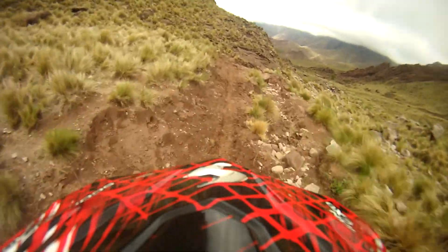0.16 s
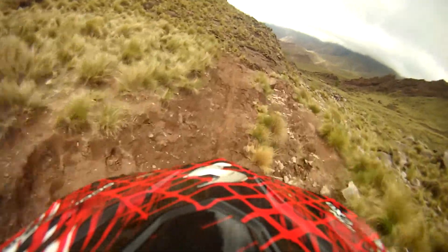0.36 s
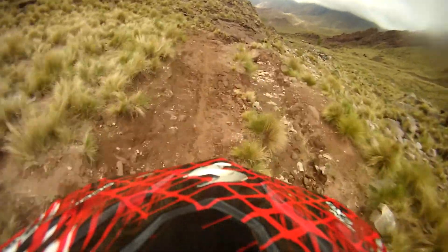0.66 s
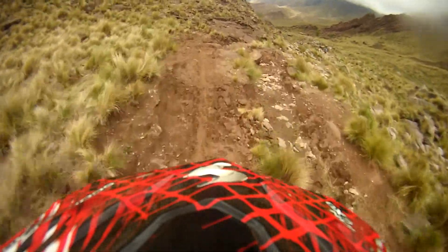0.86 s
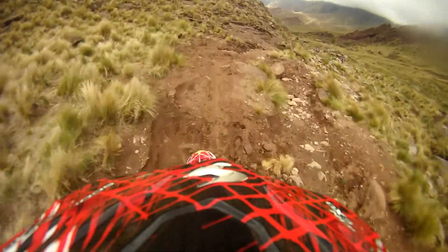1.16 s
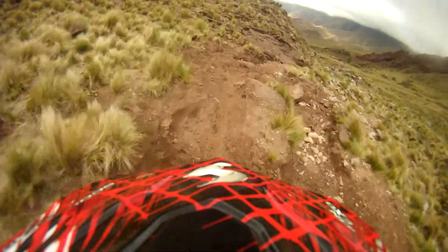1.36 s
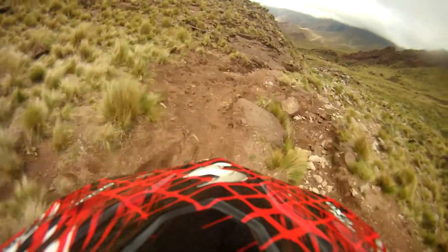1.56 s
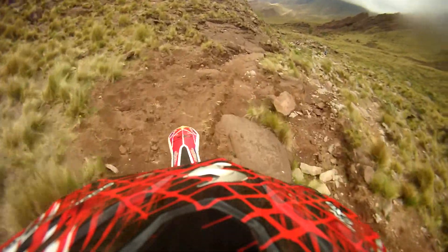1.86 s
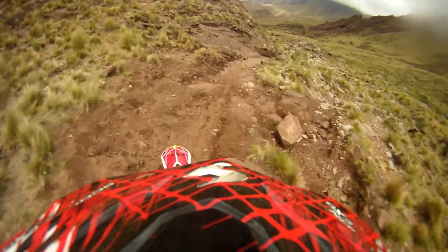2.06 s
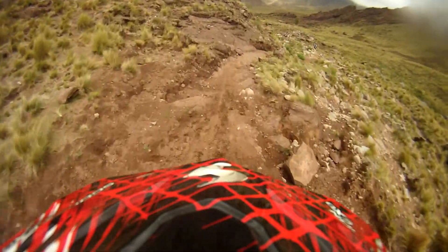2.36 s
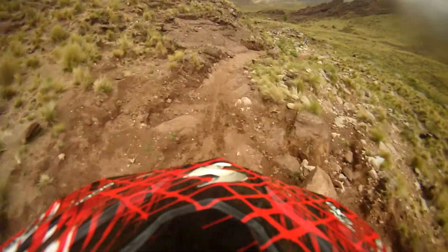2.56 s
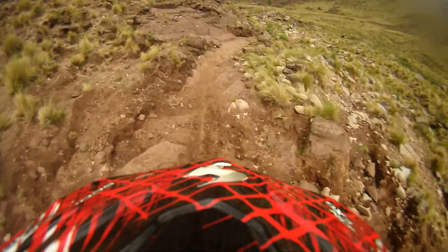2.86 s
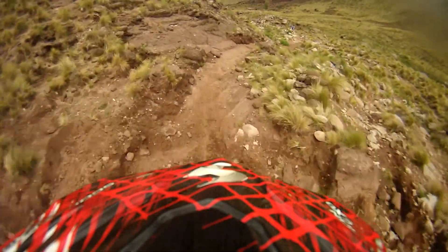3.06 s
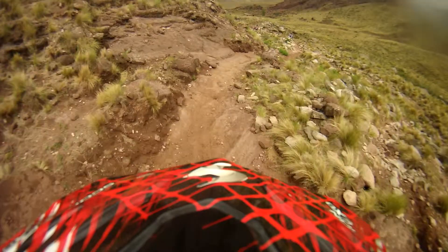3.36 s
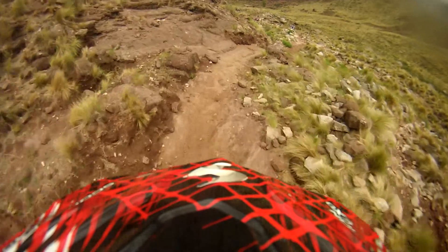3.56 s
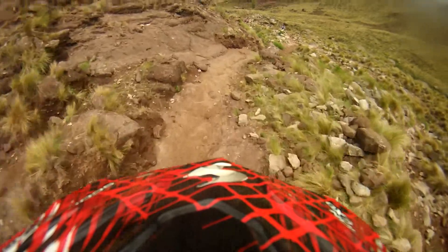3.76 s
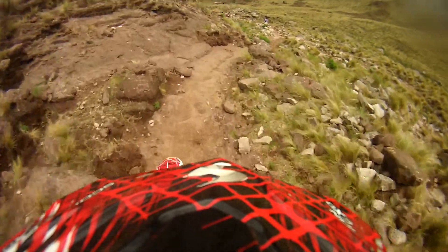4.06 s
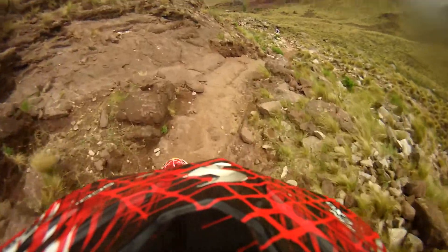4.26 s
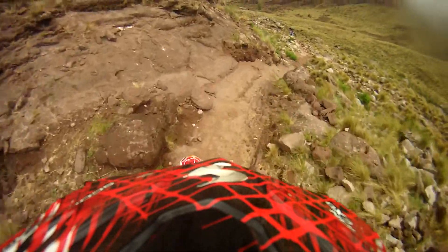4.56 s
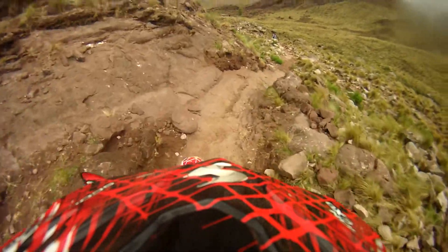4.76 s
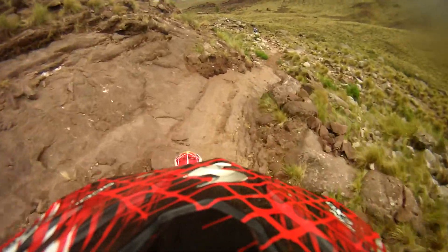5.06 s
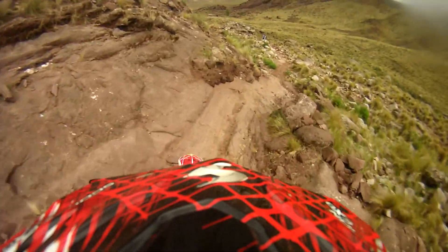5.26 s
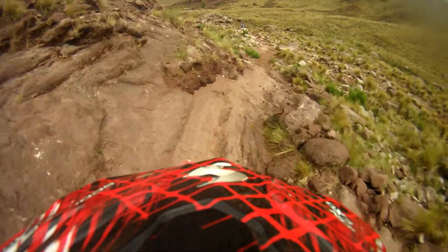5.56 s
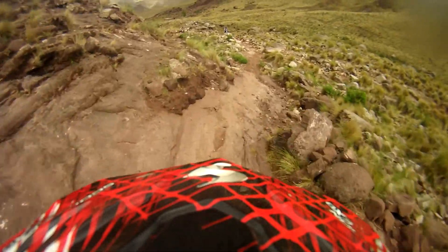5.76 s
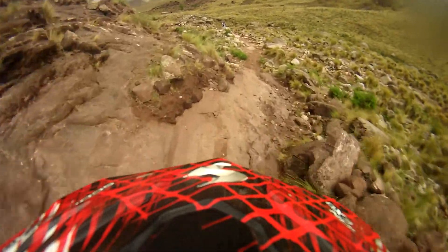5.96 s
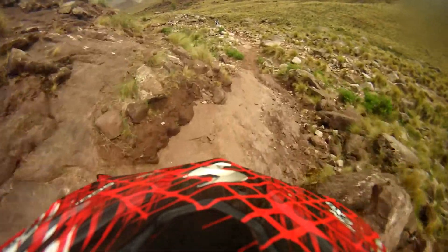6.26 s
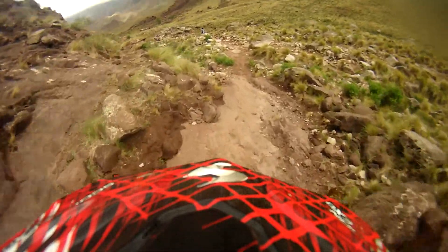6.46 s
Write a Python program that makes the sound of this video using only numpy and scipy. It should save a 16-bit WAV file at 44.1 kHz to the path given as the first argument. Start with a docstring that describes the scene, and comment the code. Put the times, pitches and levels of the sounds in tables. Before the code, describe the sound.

From a cased camera on the rider's helmet, a four-stroke single dirt bike pulls over a rocky mountain trail. Tyres rumble and crunch, a stone knocks the bike, then a wide throttle twist roars at about one second. Another stone hits, revs sink, and the chain slaps. The engine chugs near idle, with ticking clatter and faint gear whine, the intake briefly faltering near the end.

```python
"""A four-stroke single dirt bike on a rocky trail, heard from a camera in a case on the rider's helmet.
It starts well above idle, tyres rumbling and crunching over rocks; one wide twist roars at 1.1 s.
Stones knock the bike at 0.6 and 2.5 s; the revs sink to a chug near idle, the chain slaps at 3.4 s, the intake falters at 6.1 s.
Throughout, suction kicks ring the airbox, firings thump in the silencer, noise and ticks clatter in the casings,
narrow noise bands sing as gears and chain, and shaped noise makes roar, ground and wind."""
import sys
import numpy as np
from scipy import signal
from scipy.fft import rfft, irfft
from scipy.io import wavfile

SR = 44100
rng = np.random.default_rng(int(sys.argv[2]) if len(sys.argv) > 2 else 0)


def materialize(psi):
    """Save the field psi as 16-bit PCM at rate SR to the path in sys.argv[1].

    A 1-D psi becomes a single channel; in a 2-D psi each row is a channel.
    """
    bounded = np.clip(np.atleast_2d(psi).T, -1, 1)
    quanta = np.round(bounded * 32767).astype(np.int16)
    wavfile.write(sys.argv[1], SR, quanta)


N = 292383
T = np.arange(N) / SR

# engine speed: (time [s], firing rate [Hz])
FIRING_RATE = [(0.0, 20.81), (0.23, 24.1), (0.77, 22.63), (0.99, 26.53), (1.36, 22.94), (1.84, 24.14),
               (1.9, 19.29), (2.36, 15.49), (2.84, 20.36), (3.39, 16.71), (3.68, 18.0), (4.16, 14.99),
               (4.66, 15.13), (4.82, 13.86), (5.07, 15.95), (5.33, 14.4), (6.17, 15.73), (6.63, 17.97)]
# throttle twists: (time at the widest [s], opening [0-1], opening time [s], closing time [s])
THROTTLE_TWISTS = [(.03, 0.39, 0.3, 0.078), (1.092, 0.76, .26, .23), (1.82, 0.17, 0.18, 0.17),
                   (5.0, 0.19, 0.47, 0.34), (6.35, 0.2, 0.62, 0.21), (6.6, 0.2, 0.19, .15)]

# resonances: (frequency [Hz], width [Hz], relative level [dB])
SNORKEL_MODES = [(208, 85, 0)]
AIRBOX_MODES = [(268, 92, 0)]
SILENCER_MODES = [(35, 17, 0), (66, 40, -7), (98, 24, -13), (125, 20, -18)]
FRAME_MODES = [(42, 48, 0)]
CASING_MODES = [(502, 110, 4.5), (1210, 59, -1), (1353, 22, 10.5), (1609, 33, 7), (2234, 240, 4.5),
                (2640, 650, -16.5)]
STONE_MODES = [(1150, 130, 0), (1600, 500, -8), (2350, 450, -10), (5000, 900, -24)]
SWINGARM_MODES = [(2280, 140, -5.5), (2540, 58, -3), (4710, 99, -7)]
# camera case passing a little sharp treble of the knocks, same columns
CASE_LEAK_MODES = [(5200, 1900, -9)]

# noise spectra: (frequency [Hz], relative density [dB per Hz])
WIND_SPECTRUM = [(8, -6), (20, 0.5), (38, -4.5), (60, -10.5), (120, -35.5), (400, -68), (2000, -93)]
RUMBLE_SPECTRUM = [(15, -7), (45, 14), (85, 13.5), (140, 13.5), (200, 9), (320, -9), (600, -51.5),
                   (3000, -96)]
CRUNCH_SPECTRUM = [(150, -27), (300, 1), (500, -7), (900, -17), (2000, -48.5), (6000, -79)]
CLATTER_SPECTRUM = [(200, -28.5), (350, -16.5), (480, -4), (650, 1.5), (950, 0), (1250, -4), (1500, -8.5),
                    (1950, -2), (2350, -1), (3000, -9.5), (3600, -23.5), (4200, -34), (4900, -31),
                    (7000, -42), (10000, -76)]
ROAR_SPECTRUM = [(110, -39), (165, -13), (215, -2), (280, 8.5), (390, 1.5), (520, -5), (700, -10.5),
                 (1100, -11.5), (1600, -27), (3000, -59.5), (7000, -107)]

# layer levels: (at idle [dB], per doubling of engine speed [dB], added at full throttle [dB])
WIND_EFFORT = (-44, 3.4, 2)
DIRT_EFFORT = (-54, 15, 1.5)
GEAR_EFFORT = (-60, 3.6, 5)
CLATTER_EFFORT = (-53.5, 6.05, 9.6)
ROAR_EFFORT = (-57, 11.5, 22.4)
AIRBOX_EFFORT = (-45, 0.28, 21.8)
# same columns, relative to the exhaust and frame levels
THUMP_EFFORT = (0.37, -2.2, 1)

# rocky patches under the tyres: (time at the middle [s], half length [s], level [dB])
ROCKY_PATCHES = [(0.055, 0.11, -31), (0.237, 0.026, -36), (0.945, 0.17, -30), (1.15, 0.18, -35),
                 (1.89, 0.1, -32), (2.076, 0.15, -34), (3.075, 0.18, -37.5), (3.358, 0.13, -41.5),
                 (5.864, 0.12, -48)]
# gears singing up under load: (time at the middle [s], half length [s], level [dB])
GEAR_SWELLS = [(.07, 0.078, -46.5), (.62, 0.16, -50), (1.64, 0.086, -45), (1.8, .1, -47.5),
               (2.16, 0.089, -54), (2.88, 0.037, -55), (3.68, 0.034, -51), (4.75, .22, -59),
               (5.42, 0.13, -53.5)]
# stones striking the bike: (time [s], peak level [dB])
STONE_HITS = [(.6265, -35), (.6291, -28.5), (2.4585, -28), (2.4611, -34)]
# chain slapping the swingarm: (time [s], peak level [dB])
CHAIN_SLAPS = [(3.397, -38.5), (3.409, -43), (3.526, -38), (3.533, -37)]
# chain whirring over its guide: (time [s], centre [Hz], level [dB])
CHAIN_WHIR = [(0, 1292, -68), (2.5, 1340, -81), (2.85, 1316, -57.5), (3.15, 1256, -68.5), (3.65, 1102, -60),
              (4.8, 970, -65), (5.6, 949, -68), (6.2, 981, -56.5), (6.63, 1005, -70)]

IDLE_HZ, START_CYCLES = 15, -.075
GEAR_HZ, GEAR_DRIFT_HZ_PER_S = 764.6, 13
CRUNCH_RE_RUMBLE_DB = -11.5
EXHAUST_DB, FRAME_DB = -39.3, -44.8
FALTER_S, FALTER_DB, FALTER_HALF_S = 6.128, -14, .03
HISS_DB, TOP_HZ = -78.5, 15720


def undb(db):
    """Decibels to gain."""
    return 10 ** (np.asarray(db) / 20)


def curves(rows):
    """Table columns, joined by straight lines in time."""
    s, *columns = np.transpose(rows)
    return [np.interp(T, s, c) for c in columns]


def unit(x):
    """Scale to rms 1."""
    return x / np.sqrt(np.mean(x ** 2))


def noise():
    """White noise."""
    return rng.standard_normal(N)


def walk(rate_hz):
    """Slow random wander of rms 1, one knot per 1 / rate_hz."""
    knots = rng.standard_normal(400)
    return unit(np.interp(T * rate_hz, np.arange(len(knots)), knots))


def colour(x, spectrum):
    """Filter to a spectrum, straight over log frequency, at rms 1."""
    hz, db = np.transpose(spectrum)
    f = np.maximum(np.fft.rfftfreq(N, 1 / SR), 1)
    gain = undb(np.interp(np.log(f), np.log(hz), db))
    return unit(irfft(rfft(x) * gain, N))


def ring(x, modes):
    """Parallel resonances."""
    out = 0
    for hz, width_hz, db in modes:
        b, a = signal.iirpeak(hz, hz / width_hz, fs=SR)
        out = out + undb(db) * signal.lfilter(b, a, x)
    return out


def lowpass(x, hz, order=2):
    """Butterworth treble cut."""
    return signal.sosfilt(signal.butter(order, hz, fs=SR, output="sos"), x)


def kicks(turn, at, scatter_db):
    """One impulse of scattered strength per engine cycle, at a given share of it."""
    where = np.flatnonzero(np.diff(np.floor(turn - at)) > 0)
    out = np.zeros(N)
    out[where] = undb(scatter_db * rng.standard_normal(len(where)))
    return out


def throb(turn, at, depth_db):
    """Gain that swells once a cycle, widest at a given share of it."""
    return unit(undb(depth_db * np.cos(2 * np.pi * (turn - at))))


def swell(s, half_s):
    """Gaussian rise and fall, 1 at its top."""
    return np.exp(-((T - s) / half_s) ** 2)


def swell_power(rows):
    """Summed power of swelling events."""
    return sum((undb(db) * swell(s, half_s)) ** 2 for s, half_s, db in rows)


def throttle():
    """Each twist opens the throttle evenly, then lets it close evenly."""
    opening = np.zeros(N)
    for s, widest, rise_s, fall_s in THROTTLE_TWISTS:
        opening += widest * np.interp(T, [s - rise_s, s, s + fall_s], [0, 1, 0])
    return opening


def effort_db(law, firing_hz, opening):
    """Layer level as a function of engine speed and throttle."""
    idle_db, speed_db, throttle_db = law
    return idle_db + speed_db * np.log2(firing_hz / IDLE_HZ) + throttle_db * opening


def wind(wind_db):
    """Air buffets the camera: low noise of wandering level."""
    return colour(noise(), WIND_SPECTRUM) * undb(wind_db + 2 * walk(rate_hz=2.1))


def ground(dirt_db):
    """Tyres rumble over dirt, louder on rocky patches, where they also crunch."""
    rocks = np.sqrt(swell_power(ROCKY_PATCHES))
    rumble = colour(noise(), RUMBLE_SPECTRUM) * np.hypot(rocks, undb(dirt_db))
    crunch = colour(noise(), CRUNCH_SPECTRUM) * rocks * undb(CRUNCH_RE_RUMBLE_DB)
    return rumble + crunch


def knocks(events, modes, scrape_s, scrape):
    """A sharp contact and a brief noisy scrape excite the modes of each blow."""
    out, t = np.zeros(N), T[:4096]
    for s, db in events:
        push = scrape * rng.standard_normal(len(t)) * np.exp(-t / scrape_s)
        push[0] += 1
        body = ring(push, modes)
        leak = ring(ring(body, CASE_LEAK_MODES), CASE_LEAK_MODES)
        hit = lowpass(body, hz=2640, order=7) + leak
        start = int(s * SR)
        out[start:start + len(t)] += undb(db) * hit / np.max(np.abs(hit))
    return out


def whir(turn, hz, width_hz):
    """Worn teeth sing in a rough noise band around hz, swelling once a cycle."""
    shake = lowpass(noise(), width_hz) + 1j * lowpass(noise(), width_hz)
    carrier = np.exp(2j * np.pi * np.cumsum(hz) / SR)
    return unit(np.real(shake * carrier)) * throb(turn, at=0.5, depth_db=1.5)


def gears(turn, floor_db):
    """Gears sing steadily at a slowly rising pitch, louder as they take load."""
    song = whir(turn, GEAR_HZ + GEAR_DRIFT_HZ_PER_S * T, width_hz=70)
    return song * np.sqrt(undb(floor_db) ** 2 + swell_power(GEAR_SWELLS))


def chain(turn):
    """Chain whirs over its guide."""
    hz, db = curves(CHAIN_WHIR)
    return whir(turn, hz, width_hz=43) * undb(db)


def clatter(turn):
    """Cam chain and piston tick densely, tappets tap each cycle; casings ring unsteadily."""
    ticks = (rng.random(N) < 1800 / SR) * np.sign(noise())  # 1800 per second
    tappets = unit(kicks(turn, at=.02, scatter_db=1.5)
                   + kicks(turn, at=.3, scatter_db=1.5)
                   + kicks(turn, at=.85, scatter_db=2.5))
    drive = unit(ticks) + 0.91 * noise()
    drive = drive * throb(turn, at=0.19, depth_db=1.5) * undb(0.67 * walk(rate_hz=18))
    blows = drive + undb(-4) * tappets
    casings = sum(ring(blows, [mode]) * undb(2 * walk(rate_hz=13)) for mode in CASING_MODES)
    casings = unit(lowpass(casings, hz=2488, order=8))
    return unit(colour(drive, CLATTER_SPECTRUM) + undb(-5) * casings)


def thumps(turn, strokes):
    """Silencer turns each firing into a deep thump; strokes shake the frame."""
    firings = kicks(turn, at=.2, scatter_db=1.2)
    exhaust = unit(lowpass(ring(firings, SILENCER_MODES), hz=92))
    shake = unit(lowpass(ring(strokes, FRAME_MODES), hz=300))
    return undb(EXHAUST_DB) * exhaust + undb(FRAME_DB) * shake


def roar(turn, roar_db):
    """Air tears past the throttle plate in gulps: noise throbbing once a cycle."""
    gulps = noise() * throb(turn, at=0.1, depth_db=4)
    return colour(gulps, ROAR_SPECTRUM) * undb(roar_db)


def intake(turn, strokes, airbox_db):
    """Start and stop of suction ring the snorkel and airbox."""
    chuff = unit(lowpass(ring(ring(strokes, SNORKEL_MODES), AIRBOX_MODES), hz=256))
    # harder draw: airflow keeps the box ringing between kicks
    flutter = unit(ring(ring(noise(), AIRBOX_MODES), AIRBOX_MODES))
    flutter = flutter * throb(turn, at=.15, depth_db=1.5)
    share = undb(0.5 + 1.25 * (airbox_db - np.max(airbox_db)))
    return (chuff + share * flutter) / np.sqrt(1 + share ** 2) * undb(airbox_db)


def scene():
    """Air, ground and engine close to the helmet, driven by engine speed and throttle."""
    firing_hz, = curves(FIRING_RATE)
    turn = START_CYCLES + np.cumsum(firing_hz) / SR  # engine cycles
    opening = throttle()

    def level_db(law):
        """Layer level at the current speed and throttle."""
        return effort_db(law, firing_hz, opening)

    # higher revs, faster bike, more wind
    air = wind(level_db(WIND_EFFORT))
    tyres = ground(level_db(DIRT_EFFORT))
    stones = knocks(STONE_HITS, STONE_MODES, scrape_s=0.004, scrape=0.045)
    slaps = knocks(CHAIN_SLAPS, SWINGARM_MODES, scrape_s=.007, scrape=.5)
    drivetrain = gears(turn, level_db(GEAR_EFFORT)) + chain(turn)
    valve_gear = clatter(turn) * undb(level_db(CLATTER_EFFORT))
    # suction starts and stops a quarter cycle apart: opposite kicks
    strokes = kicks(turn, 0, scatter_db=.9) - .88 * kicks(turn, 1 / 4, scatter_db=.9)
    thump = thumps(turn, strokes) * undb(level_db(THUMP_EFFORT))
    suction = intake(turn, strokes, level_db(AIRBOX_EFFORT)) + roar(turn, level_db(ROAR_EFFORT))
    suction = suction * undb(FALTER_DB * swell(FALTER_S, FALTER_HALF_S))
    return (air + tyres + stones + slaps + drivetrain + valve_gear + thump + suction)[None]


def record(dry):
    """Camera adds faint hiss and cuts the top; the sound fades in over 4 ms."""
    fade_in = np.minimum(T / .004, 1)
    top_cut = signal.ellip(10, .2, 70, TOP_HZ, fs=SR, output="sos")
    return signal.sosfilt(top_cut, fade_in * dry + undb(HISS_DB) * noise())


dry = scene()
out = record(dry)
materialize(out)
```